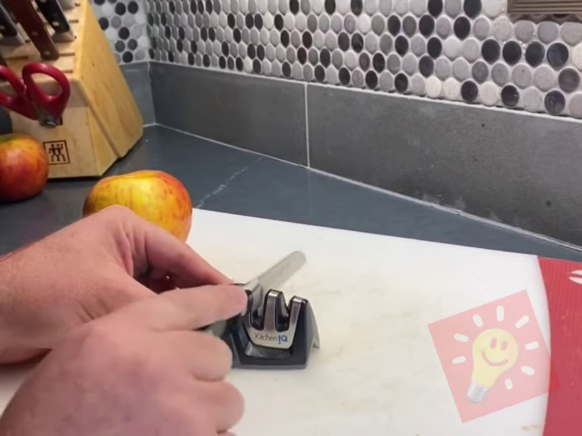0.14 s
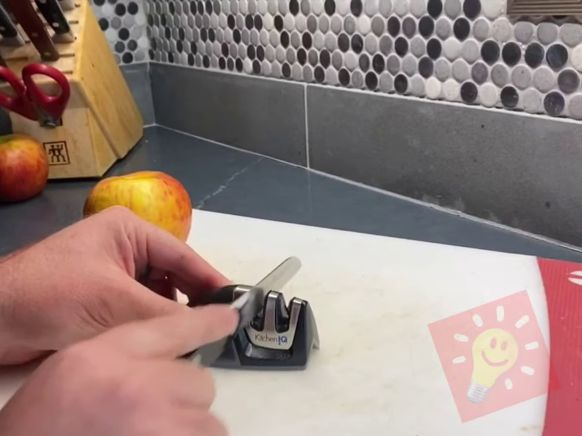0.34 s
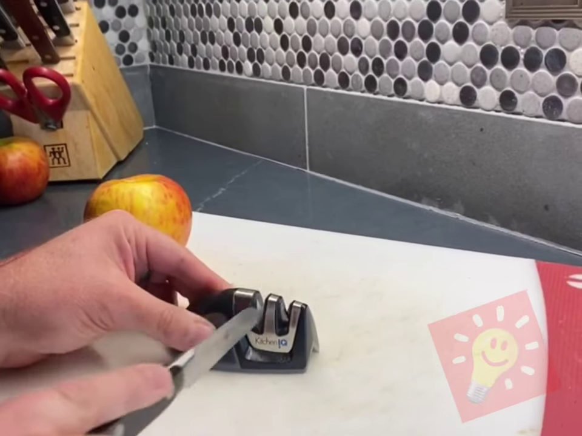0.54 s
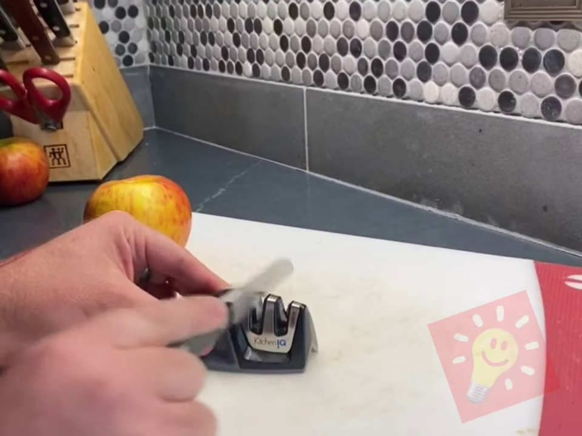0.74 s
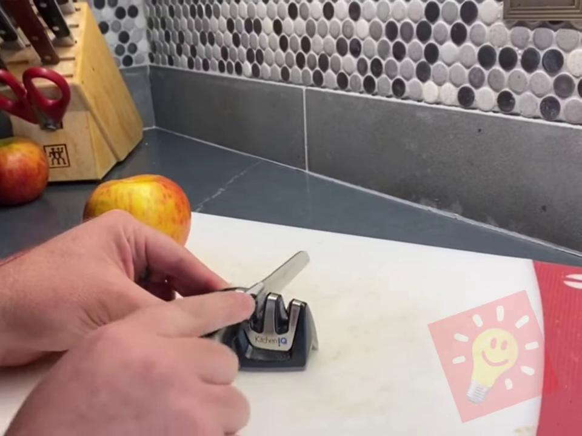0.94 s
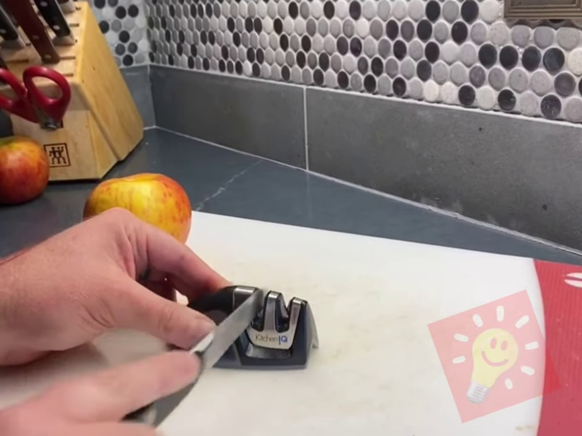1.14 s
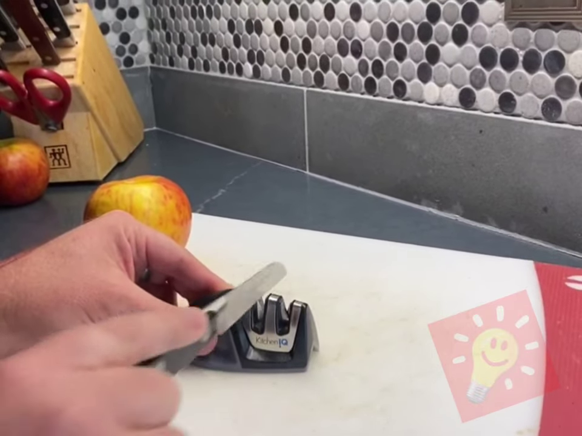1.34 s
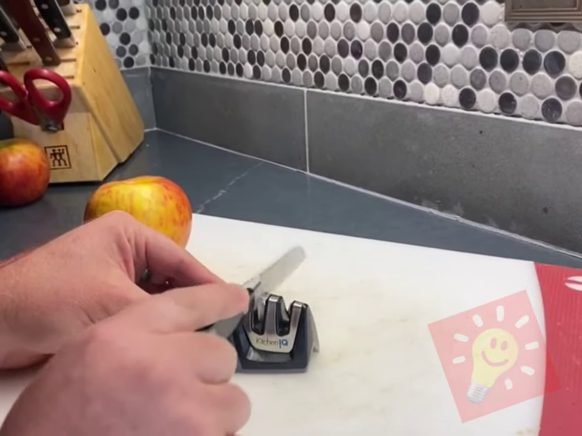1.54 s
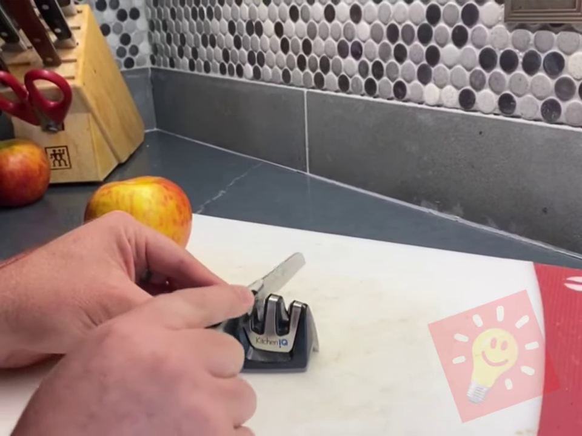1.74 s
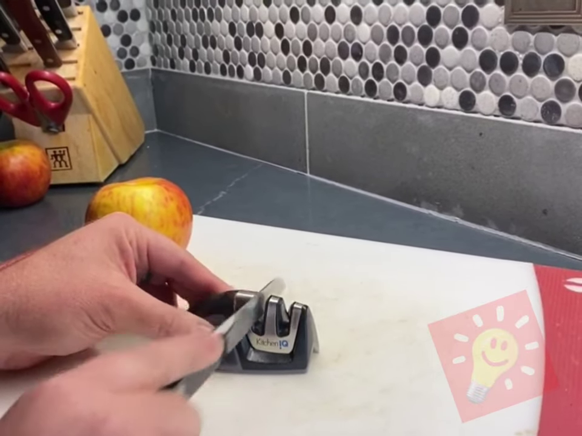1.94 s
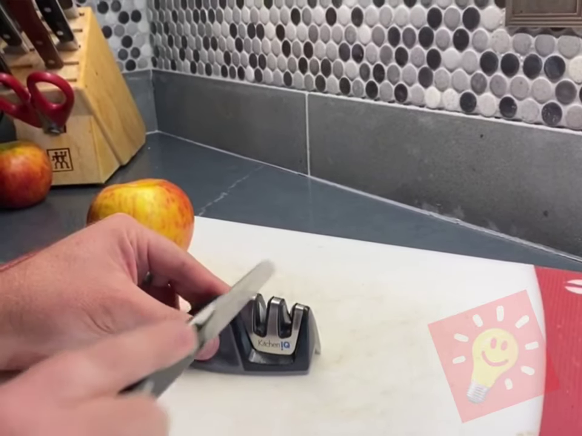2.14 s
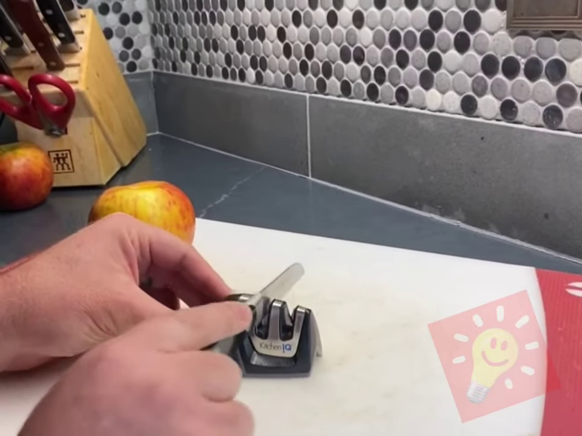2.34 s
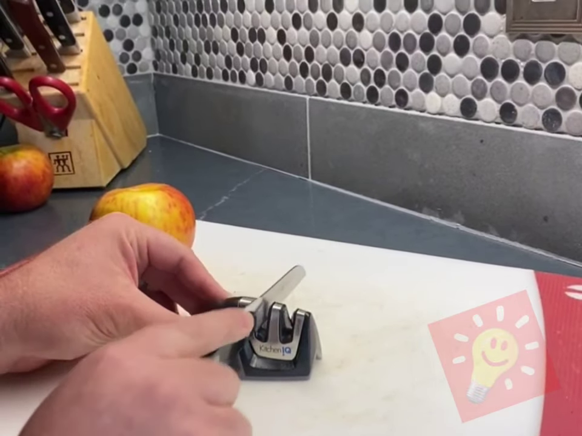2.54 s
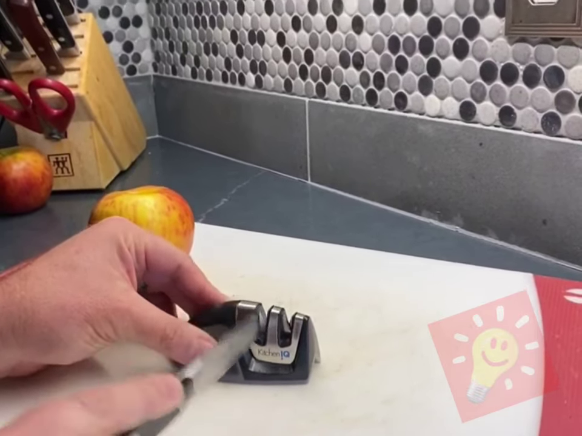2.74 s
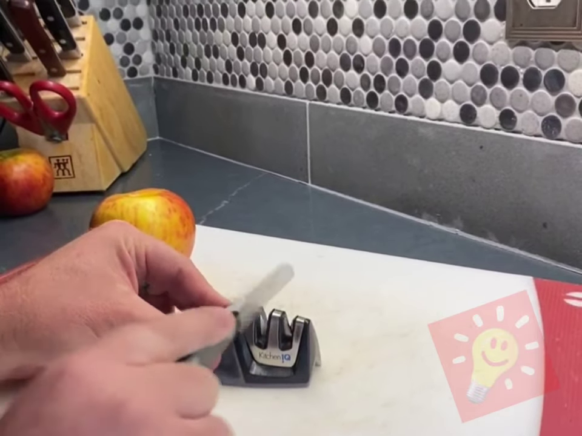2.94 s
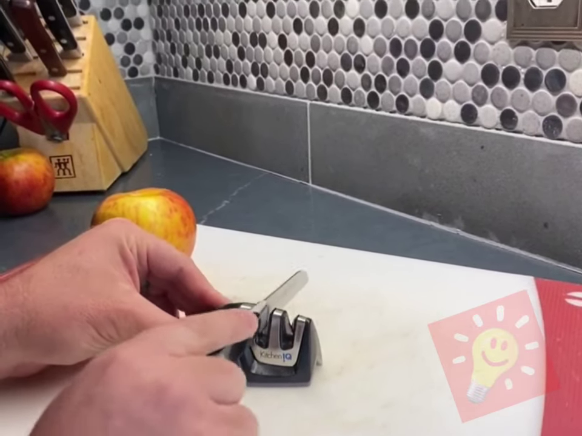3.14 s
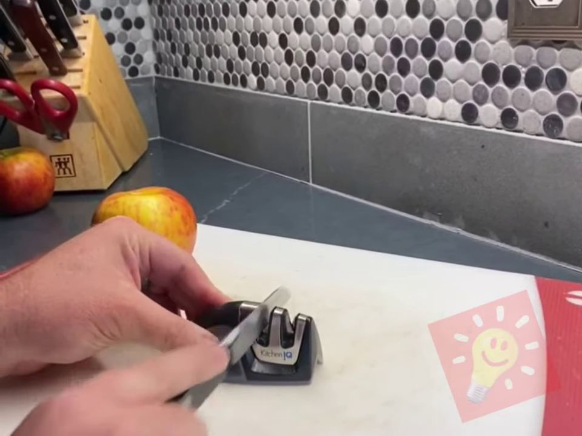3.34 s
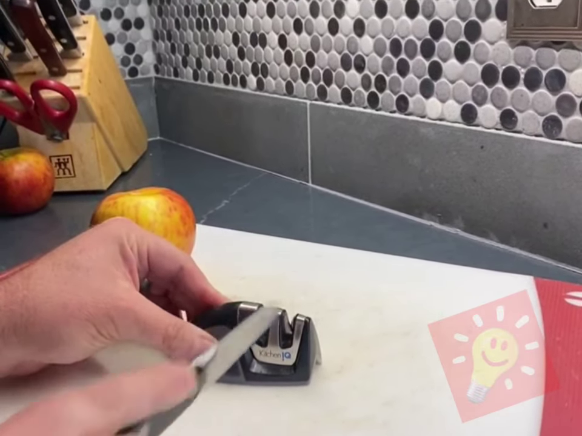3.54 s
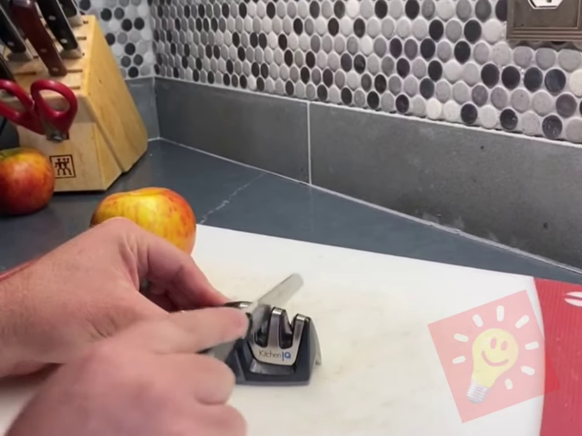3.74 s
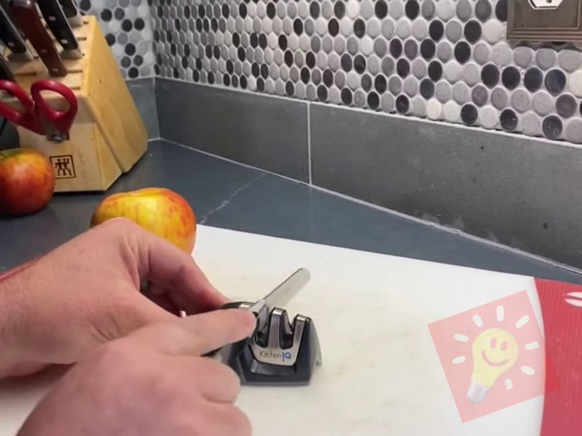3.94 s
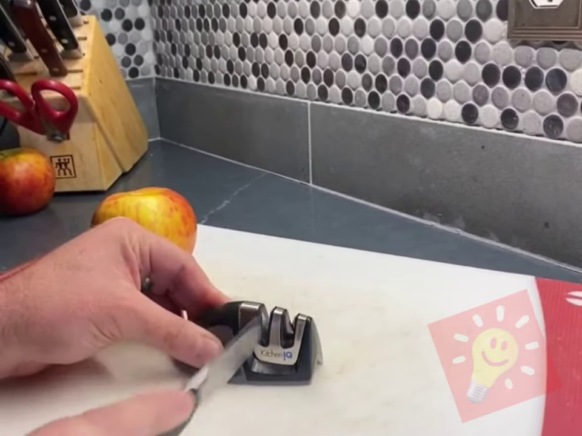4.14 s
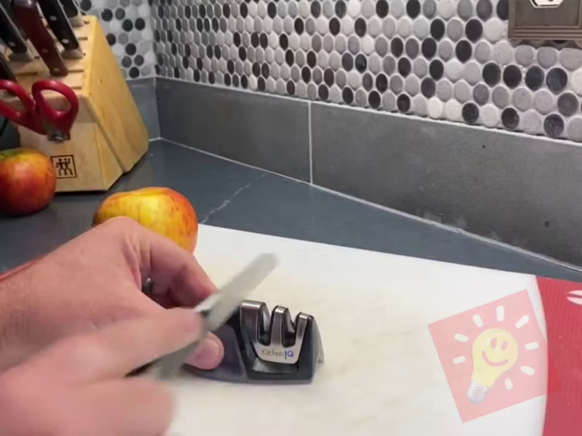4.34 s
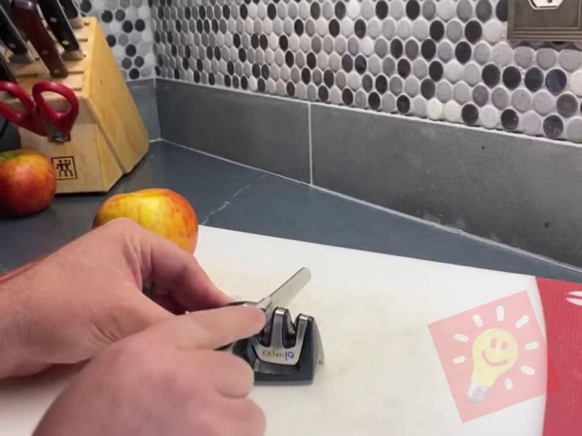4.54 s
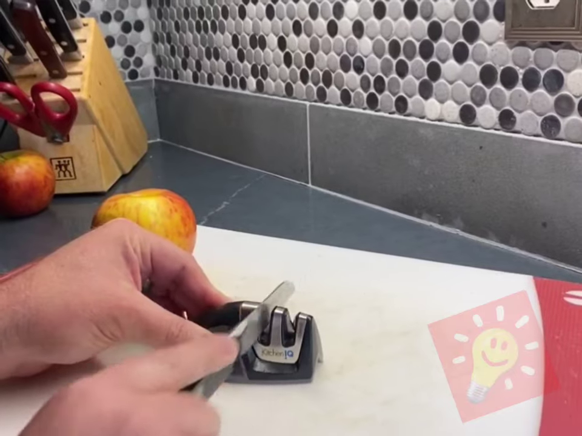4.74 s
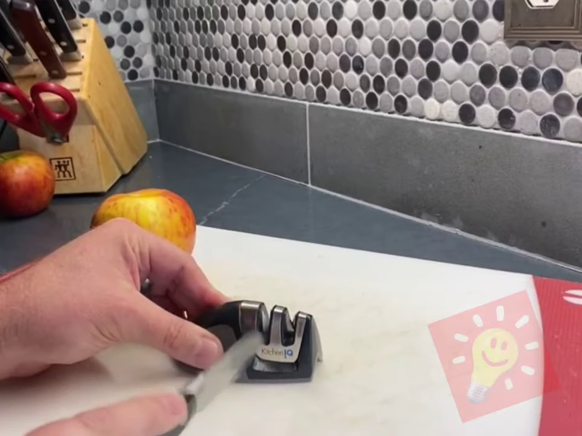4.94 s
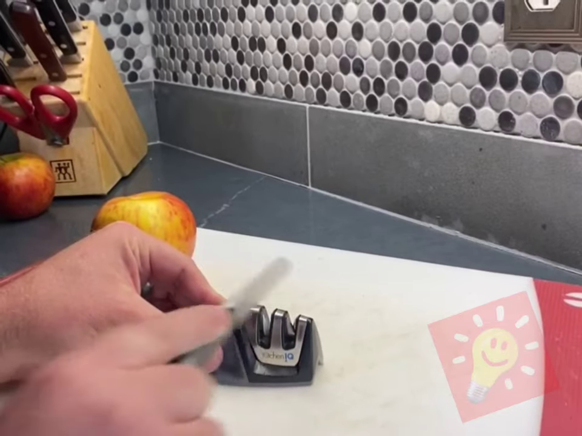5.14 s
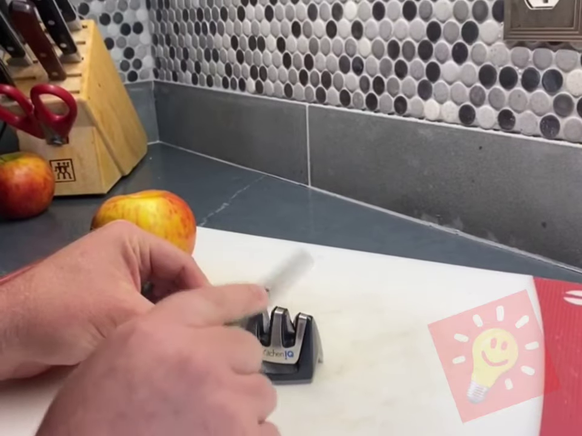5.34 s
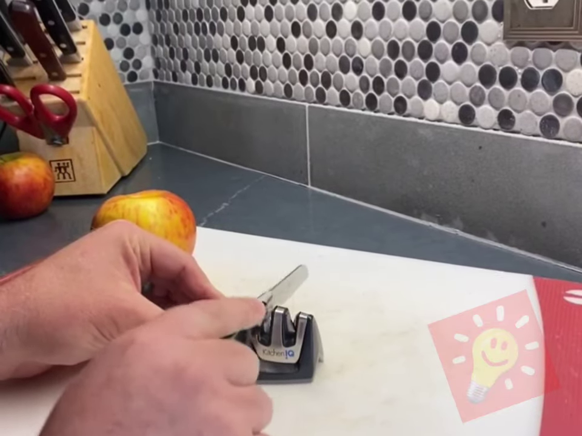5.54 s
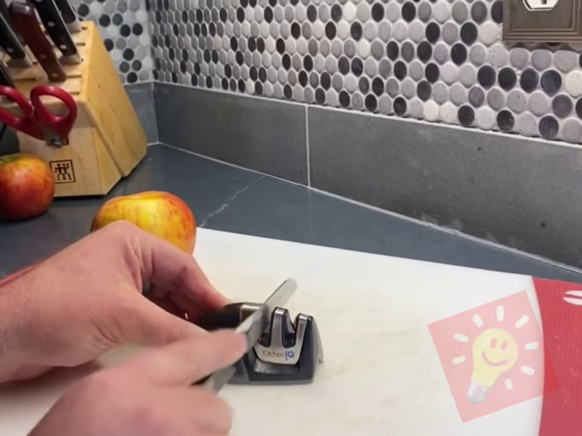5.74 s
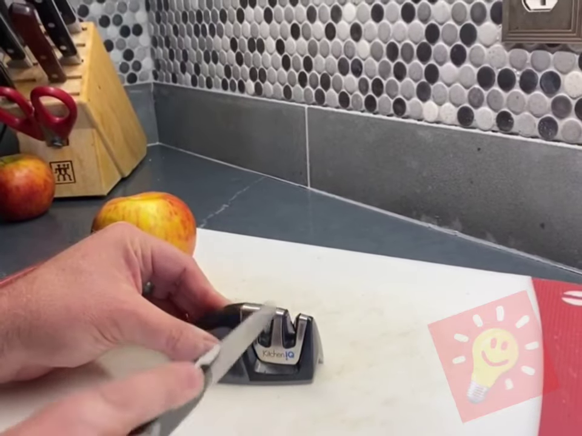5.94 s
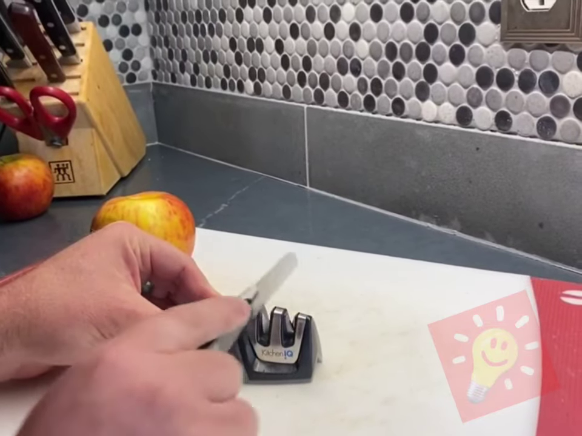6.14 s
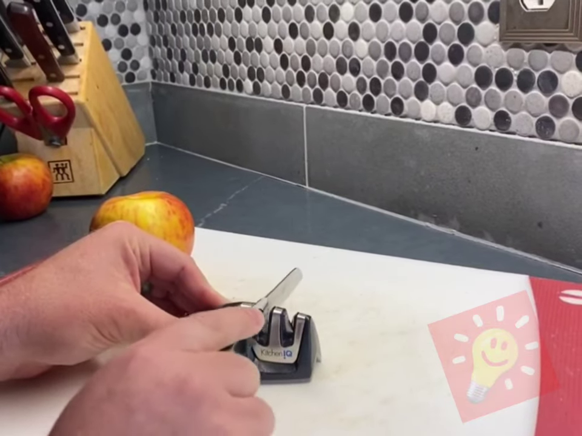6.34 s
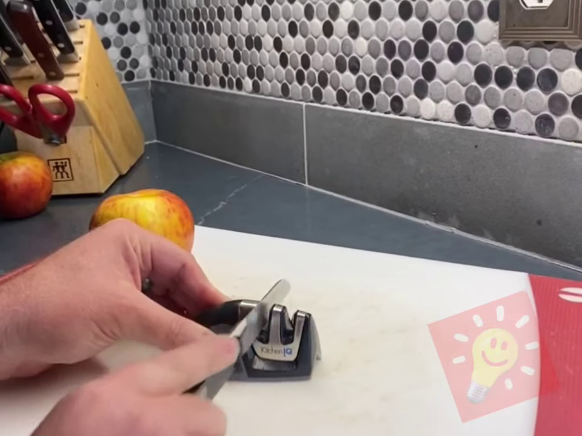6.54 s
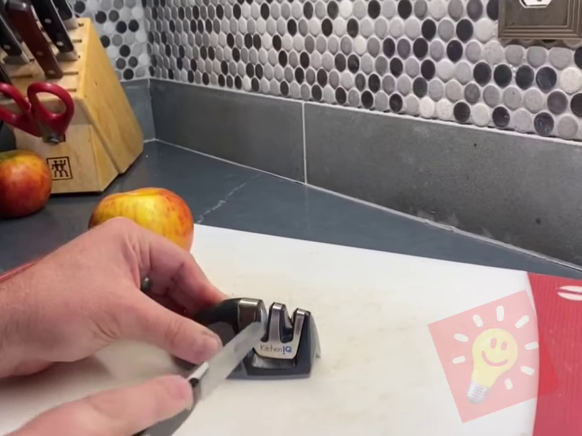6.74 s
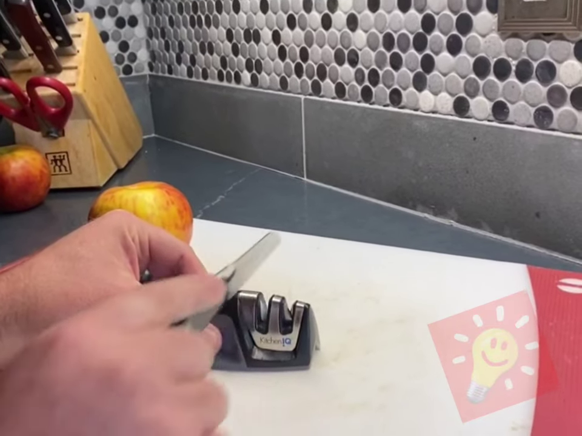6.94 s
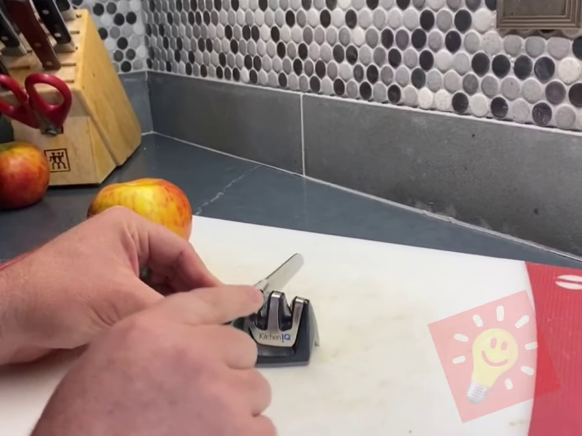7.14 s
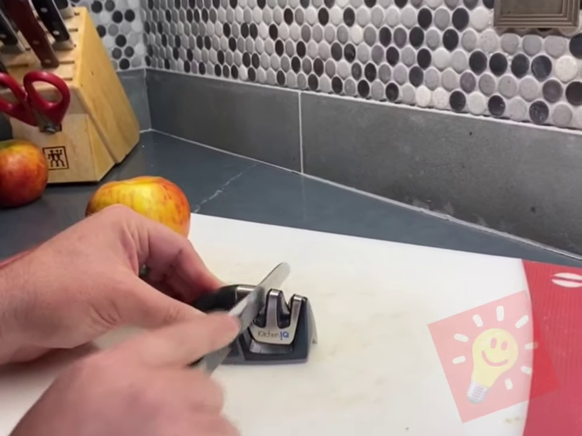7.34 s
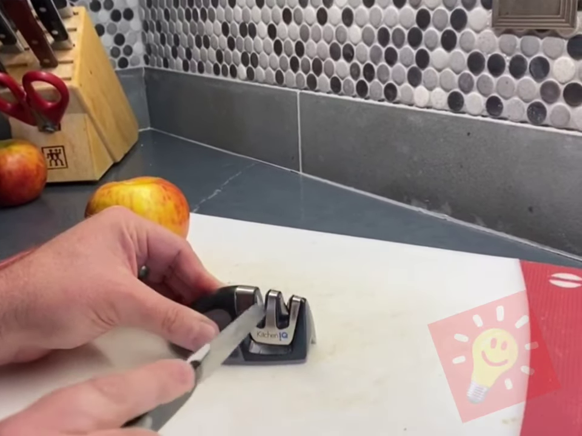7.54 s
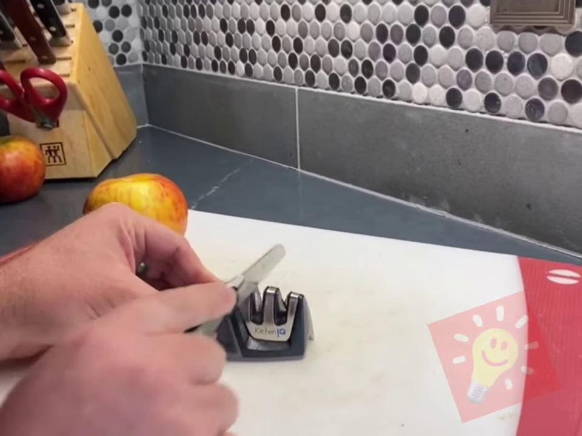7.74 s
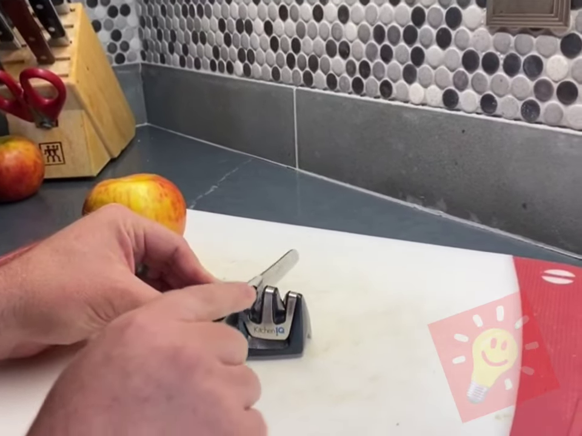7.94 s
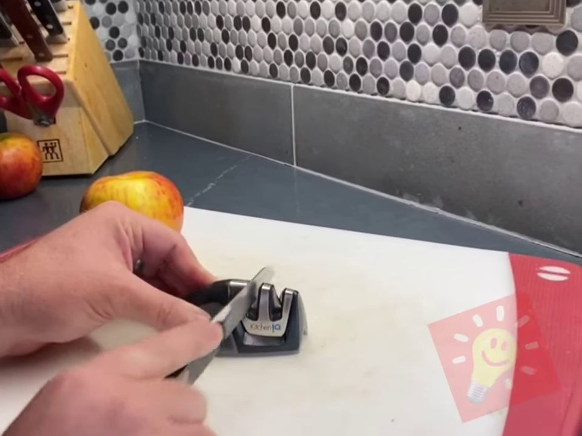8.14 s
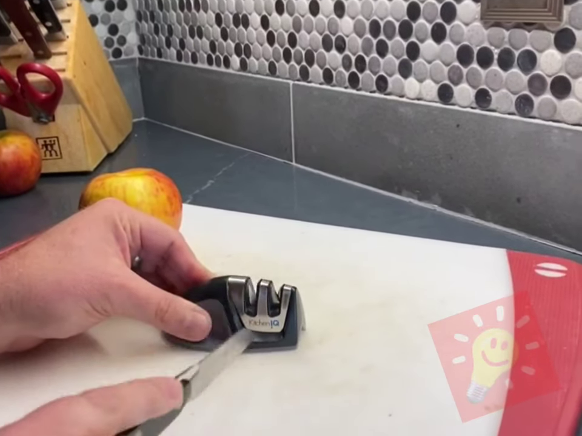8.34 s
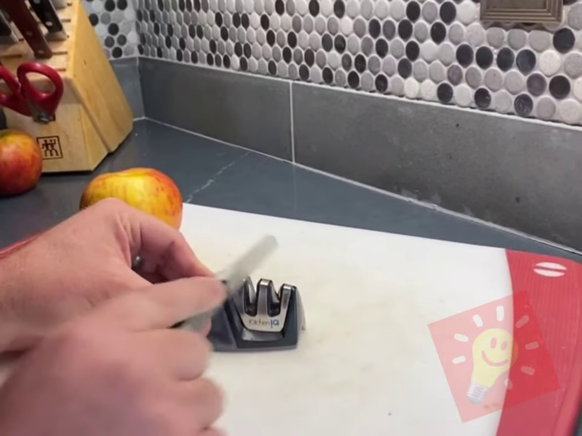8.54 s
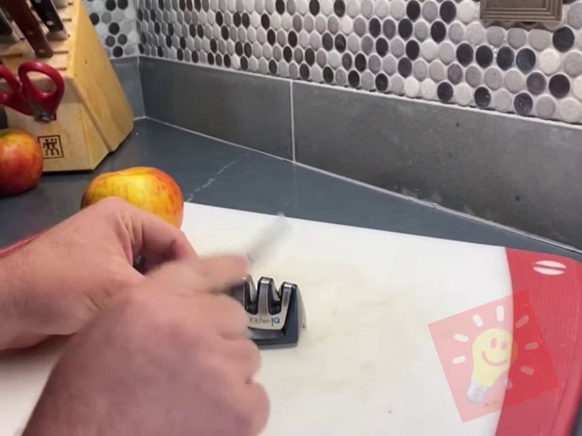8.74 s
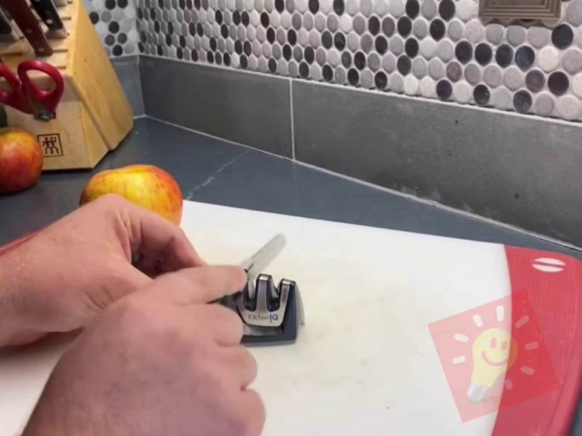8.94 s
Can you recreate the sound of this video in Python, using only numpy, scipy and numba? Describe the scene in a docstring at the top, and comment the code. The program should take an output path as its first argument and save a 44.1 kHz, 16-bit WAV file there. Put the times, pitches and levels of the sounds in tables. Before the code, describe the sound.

In a small tiled kitchen, a steel blade scrapes through a sharpener close to the microphone, a little more than once a second. Light ticks and a soft slide lead into each grainy, rising rasp, sometimes with a tiny rough squeal. After most pulls the knife tip clacks against the plastic body, leaving a short room ring. A quiet, steady house rumble continues behind the strokes.

```python
"""A small tiled kitchen: a knife is drawn eleven times through a hand-held sharpener on a cutting board.
Each time the blade clicks into the slot, slides lightly forward and is pulled back with a gritty,
rising rasp: the edge fractures finely while the blade's bending resonances climb. Often the tip then
drops out and knocks on the plastic housing. The room rings behind it, over a low house rumble."""
import sys
import numpy as np
from scipy import signal
from scipy.fft import rfft, irfft
from scipy.io import wavfile
from numba import njit

SR = 44100
rng = np.random.default_rng(int(sys.argv[2]) if len(sys.argv) > 2 else 0)


def materialize(psi):
    """Save the field psi as 16-bit PCM at rate SR to the path in sys.argv[1].

    A 1-D psi becomes a single channel; in a 2-D psi each row is a channel.
    """
    bounded = np.clip(np.atleast_2d(psi).T, -1, 1)
    quanta = np.round(bounded * 32767).astype(np.int16)
    wavfile.write(sys.argv[1], SR, quanta)


N = 395571
TIME = np.arange(N) / SR


def amp(db):
    """Decibels to gain."""
    return 10 ** (np.asarray(db) / 20)


def unit(x):
    """Scale to rms 1."""
    return x / np.sqrt(np.mean(x ** 2) + 1e-20)


def at_hz(points, hz):
    """Read a table along a log-frequency axis."""
    f, value = np.transpose(points)
    return np.interp(np.log(np.maximum(hz, 1)), np.log(f), value)


def butter(x, hz, kind, order=2):
    """Causal Butterworth filter."""
    return signal.sosfilt(signal.butter(order, hz, kind, fs=SR, output="sos"), x)


def convolve(x, response):
    """Convolve per channel, cut to N samples."""
    return signal.fftconvolve(np.atleast_2d(x), np.atleast_2d(response), axes=1)[:, :N]


def colour(spectrum, peaks=(), size=4096):
    """Minimum-phase response of unit energy: broad spectrum plus resonant peaks."""
    hz = np.fft.rfftfreq(size, 1 / SR)
    peaks_db = sum(lift / (1 + (2 * (hz - f) / width) ** 2) for f, width, lift in peaks)
    cepstrum = irfft(np.log(amp(at_hz(spectrum, hz) + peaks_db)))
    cepstrum[1:size // 2] *= 2
    cepstrum[size // 2 + 1:] = 0
    response = irfft(np.exp(rfft(cepstrum)))
    return response / np.linalg.norm(response)


def drift(rate_hz):
    """Slow random curve, rms 1."""
    return unit(np.interp(TIME * rate_hz, np.arange(N), rng.standard_normal(N)))


def swells(rows):
    """Bell-shaped gains from (time [s], level [dB], length [s])."""
    return sum(amp(db) * np.exp(-np.minimum((2 * (TIME - s) / length) ** 2, 20))
               for s, db, length in rows)


def grit(grain_db, judder_db):
    """Tiny fractures of the edge, clumped by steel grain and hand judder."""
    return unit(rng.standard_normal(N) * amp(grain_db * drift(1400) + judder_db * drift(170)))


@njit
def gliding_resonance(x, angle, radius):
    """Two-pole resonance with a moving centre, angle in rad/sample."""
    y = np.zeros(len(x))
    for i in range(2, len(x)):
        y[i] = x[i] - x[i - 2] + 2 * radius * np.cos(angle[i]) * y[i - 1] - radius * radius * y[i - 2]
    return y


def blade_mode(drive, hz, width_hz, waver):
    """Blade resonance wavering as the contact point moves; rms 1."""
    angle = 2 * np.pi * hz * (1 + waver * drift(50)) / SR
    return unit(gliding_resonance(drive, angle, np.exp(-np.pi * width_hz / SR)))


# pulls: (start [s], time to peak pressure [s], length [s], flex [dB], peak grind [dB],
# run-out grind [dB], opening pitch [Hz], closing pitch [Hz])
PULL_STROKES = [(0.343, 0.11, .222, -29.5, -29, -36, 2089, 2810),
                (1.024, 0.15, .228, -34, -24.5, -36.5, 1603, 2586),
                (1.872, .11, 0.2, -41.5, -32.5, -36.5, 2177, 2960),
                (2.567, .13, 0.21, -33.5, -28, -37, 2180, 2900),
                (3.291, 0.12, .217, -31.5, -27.5, -31, 1906, 3042),
                (4.008, .08, 0.18, -32, -26, -34.5, 1995, 2677),
                (4.695, 0.15, .258, -31.5, -26, -33.5, 1950, 2964),
                (5.695, .12, .257, -40.5, -35, -33.5, 1777, 3180),
                (6.49, 0.14, .265, -31.5, -28.5, -31.5, 2470, 2654),
                (7.277, 0.14, .243, -31.5, -29, -34, 2545, 2830),
                (8.038, .135, .277, -32.5, -27.5, -36, 1992, 2357)]
def pulls(contact_s=0.03, grind_swell_db=21.5, grind_ease_s=0.014,
          flex_attack_s=0.051, flex_swell_db=3.5, flex_fall_db=17, flex_fall_s=0.018,
          climb_delay_s=0.035, climb_overrun_s=0.022):
    """Flex gain, grind gain, pitch: pressure peaks and eases; the shortening overhang stiffens."""
    flex, grind, hz = np.zeros(N), np.zeros(N), np.full(N, float(PULL_STROKES[0][-2]))
    for start, peak_s, length, flex_db, grind_db, runout_db, opening_hz, closing_hz in PULL_STROKES:
        span = (TIME >= start) & (TIME < start + length + contact_s)
        t = TIME[span] - start
        contact = np.clip(np.minimum(t, length + contact_s - t) / contact_s, 0, 1)
        past_s = np.maximum(t - peak_s, 0)
        bend_db = np.interp(t, [0, flex_attack_s], [-flex_swell_db, 0])
        stiffen_db = flex_fall_db * (1 - np.exp(-past_s / flex_fall_s))
        press_db = np.interp(t, [0, peak_s], [-grind_swell_db, 0])
        ease_db = (runout_db - grind_db) * (1 - np.exp(-past_s / grind_ease_s))
        flex[span] = contact * amp(flex_db + bend_db - stiffen_db)
        grind[span] = contact * amp(grind_db + press_db + ease_db)
        hz[span] = np.interp(t, [climb_delay_s, peak_s + climb_overrun_s], [opening_hz, closing_hz])
    return flex, grind, hz


# edge catches: (time [s], relative level [dB], length [s])
EDGE_BITES = [(0.222, -25, 0.0027), (0.441, -22.5, 0.012), (1.229, -18.5, 0.0025), (2.701, -31, 0.0092),
              (3.392, -30.5, 0.025), (3.484, -17, 0.0017), (4.101, -32, 0.012), (4.125, -22.5, 0.0039),
              (4.814, -26.5, 0.011), (4.923, -31.5, 0.005), (4.943, -25, 0.008), (5.688, -33, 0.0061),
              (5.815, -32, 0.0054), (6.610, -29, 0.013), (6.725, -23.5, 0.0072), (7.405, -34, 0.028)]
def bites():
    """Extra pressure as the edge catches, in a pull or on seating."""
    return swells(EDGE_BITES)


def stereo_grit():
    """Gritty scraping, partly shared and partly independent between left and right."""
    shared, left, right = (grit(grain_db=3, judder_db=2.2) for _ in range(3))
    return unit(shared + np.array([left, right]))


# blade and sharpening plate modes: (frequency [Hz], width [Hz], lift [dB])
STEEL_MODES = [(2370, 170, -2.5), (3320, 740, 9.5), (3760, 290, 6.5), (4647, 380, 11), (5020, 300, 4.5),
               (6520, 360, 7.5), (6920, 110, 4), (8100, 540, 5), (9340, 430, 7), (11200, 350, 3.5),
               (12500, 83, 1.5), (14500, 430, -8)]
# grinding spectrum: (frequency [Hz], level [dB])
GRIND_SPECTRUM = [(100, -14), (500, -3.5), (1000, 0.5), (1600, 1), (3000, 3), (4200, -4), (5800, 1),
                  (9000, -1), (10000, -5), (12000, 3.5), (15500, -3)]
def grinding(grind, pull_db=-2, bite_db=-1, slide_db=-1.5, chips_db=-4, chips_hz=8500):
    """Edge pressure drives grit into the steel; harder pulls shed more fine, bright chips."""
    pressure = amp(pull_db) * grind + amp(bite_db) * bites() + amp(slide_db) * slides()
    chipping = amp(chips_db) * pressure * (pressure / grind.max()) ** 0.98
    chips = butter(chipping * stereo_grit(), chips_hz, "high")
    return convolve(pressure * stereo_grit() + chips, colour(GRIND_SPECTRUM, STEEL_MODES))


# bending spectrum: (frequency [Hz], level [dB])
FLEX_SPECTRUM = [(100, -17), (600, 2.5), (1050, 0.5), (1500, 8), (2600, 3), (3500, 5.5), (4500, -0.5),
                 (15000, -67.5)]
def flexing(drive, flex, hz, cluster_db=-5, spread=0.21):
    """The blade bends about the slot; its resonances climb as the overhang shortens."""
    cluster = sum(blade_mode(drive, hz * (1 + k * spread), width_hz=15, waver=0.048) for k in (-1, 0, 1))
    broad = blade_mode(drive, hz, width_hz=660, waver=0.0071)
    return flex * unit(convolve(broad + amp(cluster_db) * cluster, colour(FLEX_SPECTRUM)))


# upper blade modes: (frequency [Hz], relative level [dB])
WHINE_MODES = [(2560, -2.5), (3300, -6.5), (3850, -4), (4650, 2.5), (4900, 2.5), (7300, 1), (8600, -4),
               (12800, -1)]
def whine(drive, flex, grind, level_db=-9, flex_share_db=-10, flare_db=3.5, flare_rate_hz=50):
    """Upper modes flare and wander, loudest where the edge presses hardest."""
    modes = np.zeros(N)
    for hz, db in WHINE_MODES:
        flare = amp(db + flare_db * drift(flare_rate_hz))
        modes += flare * blade_mode(drive, hz, width_hz=57, waver=0.018)
    pressure = grind + bites() + amp(flex_share_db) * flex
    return amp(level_db) * pressure * (pressure / pressure.max()) ** 0.37 * modes


# stick-slip bursts: (time [s], relative level [dB], length [s], pitch [Hz])
STICK_SLIPS = [(1.084, -31.5, 0.02, 1674), (5.016, -24, .014, 1940), (5.834, -30.5, .016, 3130),
               (7.305, -29, 0.017, 2680), (7.374, -26, 0.05, 2637), (8.081, -30, 0.053, 1906),
               (8.147, -31, 0.077, 2547), (8.221, -32.5, 0.071, 2480), (8.698, -50, 0.13, 2335)]
def squeals(drive, level_db=-1):
    """The blade sticks and slips into short, rough squeals."""
    return amp(level_db) * sum(swells([(s, db, length)]) * blade_mode(drive, hz, width_hz=68, waver=0.0095)
                               for s, db, length, hz in STICK_SLIPS)


# blade entries: (time [s], landing knock [dB], landing click [dB], slide [dB], slide length [s],
# seating delay [s], seating knock [dB], seating click [dB]); levels relative
SLOT_ENTRIES = [(0.114, -41.5, -48, -38, 0.044, 0.11, -21.5, -29),
                (0.809, -34, -35.5, -39, 0.15, .15, -30.5, -44),
                (1.445, -26, -33, -55.5, 0.17, 0.031, -22, -48),
                (1.782, -44, -39, -58, 0.11, 0.048, -28.5, -38.5),
                (2.393, -42, -40, -39.5, 0.077, 0.044, -40, -39.5),
                (3.079, -34.5, -33.5, -48, 0.18, 0.034, -26.5, -33),
                (3.81, -38.5, -32.5, -50.5, 0.17, 0.026, -26, -34.5),
                (4.533, -33.5, -26, -42, 0.11, .04, -19.5, -29.5),
                (5.257, -26, -35.5, -39.5, 0.046, 0.014, -24.5, -54),
                (5.578, -30, -47, -39.5, 0.023, .109, -23, -30),
                (6.323, -33.5, -29, -38, 0.045, 0.028, -47, -57),
                (7.139, -26.5, -25.5, -50, 0.071, 0.035, -25.5, -29.5),
                (7.854, -42.5, -34, -44, 0.1, 0.099, -30.5, -49.5),
                (8.617, -33.5, -49.5, -51, 0.19, 0.15, -40, -61)]
def slides(fade_db=7, stutter_db=3, lift_off_s=0.025):
    """Light, stuttering pressure as the blade slides forward."""
    pressure = np.zeros(N)
    for s, _, _, db, length, *_ in SLOT_ENTRIES:
        at, size = int(s * SR), int(length * SR)
        lift_off = np.minimum(TIME[size:0:-1] / lift_off_s, 1)
        slide = amp(db - np.linspace(0, fade_db, size)) * lift_off
        pressure[at:at + size] += slide[:N - at]
    return pressure * amp(stutter_db * drift(60))


# steel contact spectrum: (frequency [Hz], level [dB])
CLICK_SPECTRUM = [(100, 5.5), (700, -2), (2000, -13.5), (4500, -5), (7000, -3), (9000, -1), (12000, 1.5),
                  (15500, -1.5)]
def clicks(events, level_db, skid_t60_s, chatter_t60_s):
    """Steel on steel: the blade skids into each contact, then chatters."""
    force, t = np.zeros(N), np.arange(-SR // 20, SR // 10) / SR
    envelope_db = -60 * np.maximum(t / chatter_t60_s, -t / skid_t60_s)
    for s, _, db in events:
        at = int((s + t[0]) * SR)
        force[at:at + len(t)] += amp(db + level_db + envelope_db)
    chatter = rng.standard_normal(N) + 0.5 * rng.standard_normal((2, N))
    softer_modes = [(hz, width, 0.78 * lift) for hz, width, lift in STEEL_MODES]
    return convolve(force * chatter, colour(CLICK_SPECTRUM, softer_modes))


# modes of the housing on the board: (frequency [Hz], width [Hz], lift [dB])
HOUSING_MODES = [(293, 5.7, 3), (560, 140, 8.5), (826, 56, 10), (983, 230, 5.5), (1127, 42, 3.5),
                 (1184, 20, 6.5), (1450, 140, 3.5), (1394, 600, 4), (1579, 110, 1), (1855, 12, 4.5),
                 (1910, 23, 4), (2390, 120, 7), (4660, 260, 8.5)]
def knocks(events, spectrum, level_db, rattle, rattle_t60_s, stereo, left_lag_samples=4, left_db=-1):
    """A blow and its brief rattle ring the plastic housing."""
    force, t = np.zeros((2, N)), TIME[:SR // 20]
    for s, db, _ in events:
        noise = rng.standard_normal(len(t)) + stereo * rng.standard_normal((2, len(t)))
        blow = noise * amp(-60 * t / rattle_t60_s)
        blow *= rattle / np.linalg.norm(blow, axis=1, keepdims=True)
        blow[:, 0] += 1   # impact
        at = int(s * SR)
        force[:, at:at + len(t)] += amp(db + level_db) * blow
    left, right = convolve(force, colour(spectrum, HOUSING_MODES))
    late_left = np.interp(np.arange(N) - left_lag_samples, np.arange(N), left)
    return np.array([amp(left_db) * late_left, right])


# tip drops and bounces: (time [s], knock [dB], click [dB]); levels relative
TIP_DROPS = [(0.57, -7, -17.5), (2.089, -35, -34), (2.792, -35, -33), (3.51, -8.5, -23.5),
             (4.213, -2.5, -17.5), (4.957, -7, -24), (5.017, -31, -21), (5.955, -3.5, -18),
             (6.76, -10.5, -28), (7.523, -2.5, -19.5), (8.321, -3.5, -20.5), (8.366, -12.5, -24.5)]
# drop knock spectrum: (frequency [Hz], level [dB])
DROP_SPECTRUM = [(30, -29), (150, -11.5), (450, -10), (700, -8.5), (1150, -3), (1800, 0.5), (2500, -7.5),
                 (5000, -9), (15000, -44)]
def tip_drops():
    """The tip falls from the slot onto the housing: steel click, plastic knock."""
    click = clicks(TIP_DROPS, level_db=-0.5, skid_t60_s=0.028, chatter_t60_s=0.035)
    knock = knocks(TIP_DROPS, DROP_SPECTRUM, level_db=13.5, rattle=1.8, rattle_t60_s=0.02, stereo=0.59)
    return click, knock


# stray taps on the slot wall: (time [s], knock [dB], click [dB]); levels relative
WALL_TAPS = [(0.175, -35.5, -36.5), (0.879, -42, -32), (1.599, -40.5, -77), (4.618, -33, -67),
             (4.696, -31, -49.5), (7.248, -30.5, -42), (7.892, -40.5, -34.5)]
# light knock spectrum: (frequency [Hz], level [dB])
TOUCH_SPECTRUM = [(30, -23.5), (150, 1), (450, 0.5), (720, -7), (1150, -0.5), (1700, -2), (2400, -5),
                  (5000, -18), (15000, -39.5)]
def slot_touches():
    """The blade lands, seats and taps in the slot, each a click and a light knock."""
    landings = [(s, knock_db, click_db) for s, knock_db, click_db, *_ in SLOT_ENTRIES]
    seatings = [(s + delay, knock_db, click_db) for s, *_, delay, knock_db, click_db in SLOT_ENTRIES]
    events = landings + seatings + list(WALL_TAPS)
    click = clicks(events, level_db=-1, skid_t60_s=0.0015, chatter_t60_s=0.042)
    knock = knocks(events, TOUCH_SPECTRUM, level_db=14, rattle=0.95, rattle_t60_s=0.1, stereo=0.51)
    return click + knock


# sharpener shifts: (time [s], relative level [dB], length [s])
BOARD_SHIFTS = [(4.605, 12, 0.063), (5.618, -2, 0.098), (6.38, 2.5, 0.07), (7.936, 0.5, 0.095),
                (8.176, 1.5, 0.52)]
def shifting(level_db=-53, band_hz=(80, 280)):
    """The sharpener rubs dully on the board as the hand steadies it."""
    rub = unit(butter(rng.standard_normal(N), band_hz, "band"))
    return amp(level_db) * swells(BOARD_SHIFTS) * rub


def afterring(level_db=-25, band_hz=(1250, 2050), t60_s=0.43, build_s=0.011):
    """Tip drops leave a diffuse midrange ring among counter and tiles."""
    power = np.zeros(N)
    for s, db, _ in TIP_DROPS:
        t = np.maximum(TIME - s, 0)
        power += (amp(db + level_db - 60 * t / t60_s) * np.minimum(t / build_s, 1)) ** 2
    return np.sqrt(power) * unit(butter(rng.standard_normal((2, N)), band_hz, "band"))


# room tail spectrum: (frequency [Hz], level [dB])
TAIL_SPECTRUM = [(100, -9.5), (400, 3.5), (1050, 0), (1720, 2), (2400, -5), (5000, -8), (9000, -0.5),
                 (15000, -6.5)]
# room decay: (frequency [Hz], T60 [s])
TAIL_DECAY = [(150, 0.55), (600, 0.38), (1600, 0.45), (4000, 0.45), (8000, 0.38), (15000, 0.042)]
def kitchen(x, tail_db, near_db=-7, near_t60_s=0.092, gap_s=0.0053):
    """Board and backsplash scatter at once; the room tail follows and dies band by band."""
    t = TIME[:SR * 3 // 4]
    near = rng.standard_normal((2, len(t))) * amp(-60 * t / near_t60_s) * (t > 0.0007)
    near = butter(near, 800, "high")   # long waves bend round
    near /= np.linalg.norm(near, axis=1, keepdims=True)
    hz = np.fft.rfftfreq(len(t), 1 / SR)
    spectrum = rfft(rng.standard_normal((2, len(t)))) * amp(at_hz(TAIL_SPECTRUM, hz))
    edges_hz, tail = np.geomspace(60, 20000, 15), np.zeros_like(near)
    for low, high in zip(edges_hz, edges_hz[1:]):
        band = irfft(spectrum * (hz >= low) * (hz < high), len(t))
        tail += band * amp(-60 * t / at_hz(TAIL_DECAY, np.sqrt(low * high)))
    tail *= np.clip(t / gap_s - 1, 0, 1) / np.sqrt(0.016 * SR)
    return x + convolve(x, amp(near_db) * near + amp(tail_db) * tail)


# house rumble spectrum: (frequency [Hz], level [dB])
RUMBLE_SPECTRUM = [(20, -17), (40, -3.5), (62, 11), (85, 5), (150, 0), (300, -9), (600, -24), (1500, -28),
                   (4000, -32.5), (15000, -48)]
def house_rumble(level_db=-56.5, flutter_db=1.5, stereo=0.28, stereo_above_hz=260):
    """Low, steady rumble of the house, near mono in the bass."""
    sides = butter(rng.standard_normal((2, N)), stereo_above_hz, "high", order=1)
    gain = amp(level_db + flutter_db * drift(20))
    return gain * unit(convolve(rng.standard_normal(N) + stereo * sides, colour(RUMBLE_SPECTRUM)))


def scene(balance_db=1.14):
    """Knife and sharpener in the kitchen, slightly right, over the rumble."""
    flex, grind, hz = pulls()
    drive = grit(grain_db=0, judder_db=2.5)
    blade = flexing(drive, flex, hz) + whine(drive, flex, grind) + squeals(drive) + grinding(grind)
    drop_click, drop_knock = tip_drops()
    heard = kitchen(blade + drop_click + slot_touches() + shifting(), tail_db=-10)
    heard += kitchen(drop_knock, tail_db=-14.5) + afterring()
    return heard * amp([[-balance_db / 2], [balance_db / 2]]) + house_rumble()


def record(dry, low_cut_hz=38, high_cut_hz=15800):
    """Low cut, soft clipping of the hardest knocks, steep high cut."""
    rounded = np.tanh(butter(dry, low_cut_hz, "high"))
    return signal.sosfilt(signal.ellip(10, 0.1, 80, high_cut_hz, fs=SR, output="sos"), rounded)


dry = scene()
out = record(dry)
materialize(out)
```